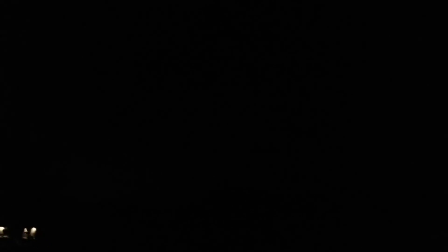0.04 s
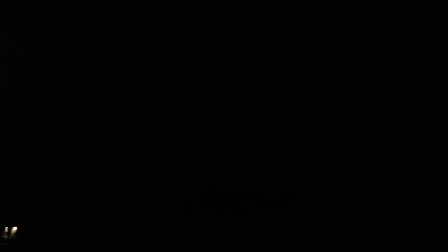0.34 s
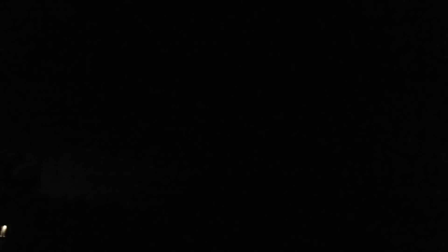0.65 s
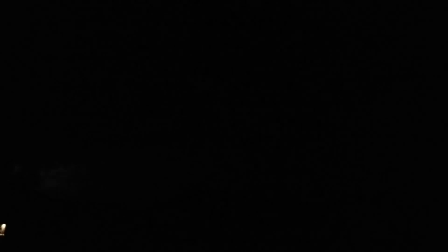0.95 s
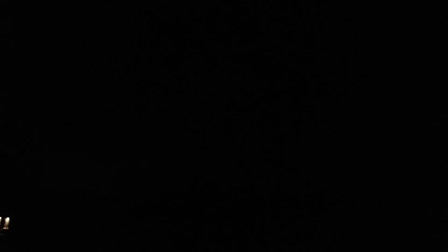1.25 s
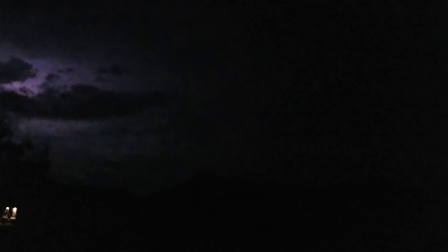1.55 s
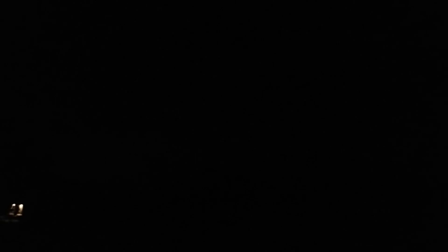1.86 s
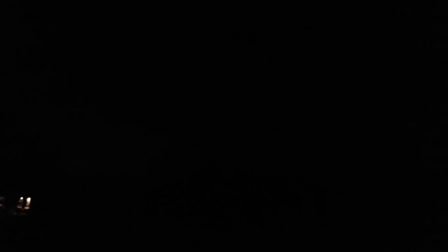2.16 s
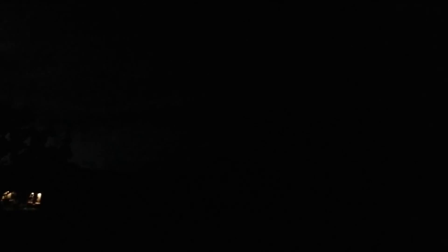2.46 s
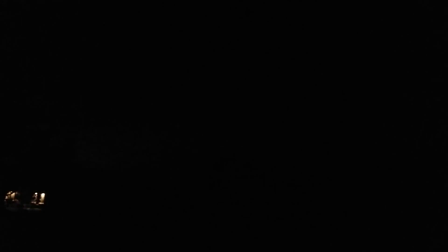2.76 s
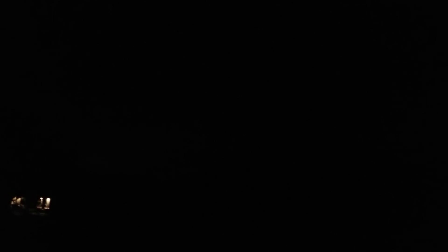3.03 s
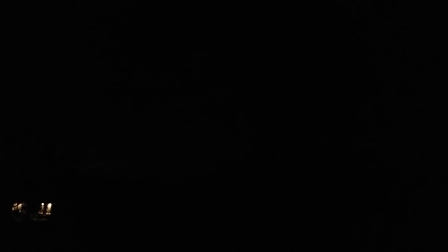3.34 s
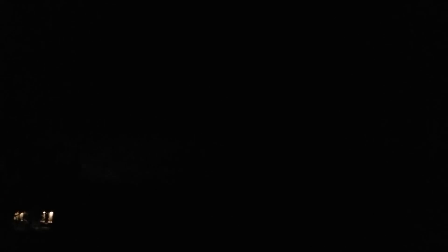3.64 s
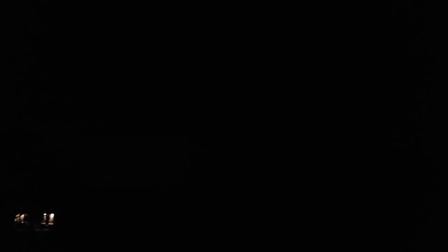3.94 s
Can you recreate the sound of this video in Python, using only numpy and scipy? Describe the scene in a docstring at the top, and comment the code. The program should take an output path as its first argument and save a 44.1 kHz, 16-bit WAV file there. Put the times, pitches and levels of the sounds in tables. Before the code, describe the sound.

Close raindrops splat and patter steadily while thunder rumbles softly far away.

```python
"""Water drips and splats on hard ground close by, in night rain heard from under a shelter.
Each impact radiates a short noise burst; heavy drops knock on a hollow surface, and a few trap a
ringing bubble. Splats reflect from a near surface about 3 ms later and again from the walls around.
Behind them lie finer patter, the hiss of far rain and rolling distant thunder.
Everything reaches the left microphone slightly before the right."""
import sys
import numpy as np
from scipy import signal
from scipy.fft import rfft, irfft
from scipy.io import wavfile
from scipy.ndimage import uniform_filter1d

SR = 44100
rng = np.random.default_rng(int(sys.argv[2]) if len(sys.argv) > 2 else 0)


def output_pcm(signal):
    """Save a mono or channel-first signal as 16-bit PCM at the path in sys.argv[1].

    Samples are clipped to [-1, 1] before scaling.
    """
    pcm = np.clip(np.atleast_2d(signal).T, -1, 1) * 32767
    wavfile.write(sys.argv[1], SR, np.round(pcm).astype(np.int16))


N = 176400


def undb(db):
    """The decibel scale: 20 dB is a tenfold amplitude."""
    return 10 ** (np.asarray(db) / 20)


def colour(x, points):
    """Spectral shaping by (frequency [Hz], gain [dB]) points, rolling off below the first."""
    hz, db = np.array(points, float).T
    f = np.maximum(np.fft.rfftfreq(x.shape[-1], 1 / SR), 1)
    gain = undb(np.interp(np.log(f), np.log(hz), db))
    bass_rolloff = np.minimum(f / hz[0], 1) ** 2
    return irfft(rfft(x) * gain * bass_rolloff, x.shape[-1])


def unit_rms(x):
    """Normalisation to unit mean power."""
    return x / np.sqrt(np.mean(x ** 2))


def delay(x, seconds):
    """Shift theorem: a linear phase lag delays a signal, even by part of a sample."""
    f = np.fft.rfftfreq(x.shape[-1], 1 / SR)
    return irfft(rfft(x) * np.exp(-2j * np.pi * f * seconds), x.shape[-1])


def stereo_pair(left, other, correlation):
    """Partial coherence: the right channel blends the left with an independent signal."""
    return np.array([left, correlation * left + np.sqrt(1 - correlation ** 2) * other])


def add(out, sound, at_s):
    """Superposition: a sound sums into the mix from its onset."""
    onset = int(round(at_s * SR))
    start, stop = max(onset, 0), min(onset + sound.shape[-1], N)
    if stop > start:
        out[:, start:stop] += sound[..., start - onset:stop - onset]


# Swells of thunder (time [s], relative roll level [dB], relative growl level [dB])
THUNDER_SWELLS = [(0.0, -55, -58), (0.15, -54, -57), (0.6, -60, -64), (0.72, -57, -63), (0.96, -48, -54),
                  (1.15, -56, -61), (1.3, -55, -57), (1.42, -60, -61), (1.63, -55, -56), (1.87, -54, -56),
                  (2.07, -45.5, -47), (2.3, -53, -54), (2.55, -53, -58), (2.82, -41.5, -56),
                  (2.98, -46.5, -56.5), (3.12, -44.5, -53.5), (3.45, -53, -56), (3.8, -57, -61)]
# Spectrum of the deep roll (frequency [Hz], relative density [dB])
ROLL_SPECTRUM = [(25, -7), (40, 4), (70, 9.5), (92, 9.5), (125, -4.5), (210, -40.5)]
# Spectrum of the higher growl (frequency [Hz], relative density [dB])
GROWL_SPECTRUM = [(85, -6), (135, 3.5), (270, -4.5), (345, -5), (440, -12.5), (560, -22.5), (750, -37),
                  (1200, -64)]


def thunder(roll_gain_db=.5, growl_gain_db=2.64):
    """An extended source: roll and growl swell as sound from different parts of the flash arrives."""
    times, roll_db, growl_db = np.array(THUNDER_SWELLS).T
    t, out = np.arange(N) / SR, 0
    bands = (ROLL_SPECTRUM, roll_db + roll_gain_db), (GROWL_SPECTRUM, growl_db + growl_gain_db)
    for spectrum, db in bands:
        rumble = colour(stereo_pair(*rng.standard_normal((2, N)), correlation=.82), spectrum)
        running_power = uniform_filter1d(np.mean(rumble ** 2, axis=0), size=SR // 5)
        out = out + rumble / np.sqrt(running_power) * undb(np.interp(t, times, db))
    return out


# Spectrum of distant rain (frequency [Hz], relative density [dB])
HISS_SPECTRUM = [(500, -6), (1500, -6), (2800, -3), (5800, -6), (8500, -11), (11500, -4.5), (15500, 2.5)]


def far_rain(level_db=-60.5):
    """Incoherent summation: countless distant drops merge into a smooth hiss."""
    noise = stereo_pair(*rng.standard_normal((2, N)), correlation=.13)
    return unit_rms(colour(noise, HISS_SPECTRUM)) * undb(level_db)


RISE_S = .0002  # attack of every splash, bubble and knock
NEAR_ECHO_S, NEAR_ECHO_SPREAD_S, NEAR_ECHO_DB = .0032, .000182, -2.5
# Mean spectrum of a splash (frequency [Hz], gain [dB])
SPLASH_SPECTRUM = [(800, -25), (1100, -21.5), (1450, -17), (1900, -12.5), (2200, -4), (2850, 2), (3300, 0),
                   (3800, 4.5), (4200, -2.5), (7400, 1), (8700, -3.5), (10800, 1.5), (12300, 2),
                   (15500, -3.5)]


def splashes(times, levels_db, burst_s, size=1024):
    """Impact noise: each drop gives a burst and a short spatter, mirrored by a near surface."""
    lead_s, spatter_s, spatter_db, mic_jitter_s = .002, .002, -13.5, .00001
    body_top_hz, splat_top_hz, tint_db, averaging_s = 4500, 9000, 3.5, .007
    t = np.maximum(np.arange(size) / SR - lead_s, 0)
    f = np.fft.rfftfreq(size, 1 / SR)
    left, other, tint, chance = np.split(rng.standard_normal((len(times), 4 * size)), 4, axis=1)
    length, lag, echo = np.clip(chance.T[:3, :, None], -2, 2)
    decay_s = burst_s * np.exp(.45 * length)
    spatter = undb(spatter_db) * np.exp(-t / spatter_s)
    envelope = (1 - np.exp(-t / RISE_S)) * (np.exp(-t / decay_s) + spatter)
    bursts = stereo_pair(left * envelope, other * envelope, correlation=.78)
    bursts[1] = delay(bursts[1], mic_jitter_s * lag)
    # A smooth random ripple gives each drop its own colour.
    tint = unit_rms(uniform_filter1d(uniform_filter1d(tint, size=24), size=24))[:, :len(f)]
    spectra = rfft(colour(bursts, SPLASH_SPECTRUM)) * undb(tint_db * tint)
    body = 1 / (1 + (f / body_top_hz) ** 20)
    spray = 1 - 1 / (1 + (f / splat_top_hz) ** 20)
    splat = 1 - body - spray
    drops = 0
    for band, db in zip((body, splat, spray), levels_db.T):
        part = irfft(spectra * band)
        power = np.mean(np.sum(part ** 2, axis=-1), axis=0) / (averaging_s * SR)
        drops = drops + part * (undb(db) / np.sqrt(power))[:, None]
    drops = drops + undb(NEAR_ECHO_DB) * delay(drops, NEAR_ECHO_S + NEAR_ECHO_SPREAD_S * echo)
    out = np.zeros((2, N))
    for k, at in enumerate(times):
        add(out, drops[:, k], at - lead_s)
    return out


# Near drips and their relative band levels (time [s], low body [dB], mid splat [dB], high spray [dB])
NEAR_DRIPS = [(0.0116, -70, -51, -43), (0.0535, -94, -52, -43), (0.1182, -84, -53, -43.5),
              (0.214, -49.5, -56, -49), (0.2882, -51.5, -50, -43), (0.298, -57, -63, -40.5),
              (0.318, -49.5, -46.5, -42), (0.4, -56, -57, -40), (0.4535, -46, -50, -43.5),
              (0.552, -69, -53.5, -37.5), (0.584, -71, -50, -47), (0.632, -70, -54, -44.5),
              (0.7045, -53, -44.5, -36), (0.7384, -53, -48.5, -39.5), (0.7478, -54.5, -55, -48),
              (0.8215, -53.5, -49, -40), (0.865, -51, -52.5, -48), (0.952, -53.5, -59, -49),
              (0.994, -53, -47, -41.5), (1.0463, -70, -61, -45.5), (1.061, -56.5, -46.5, -44.5),
              (1.1198, -59, -55, -40.5), (1.1371, -51.5, -54, -40), (1.1588, -50, -48, -39),
              (1.177, -64, -55, -45), (1.2348, -50, -46.5, -43), (1.25, -46.5, -54.5, -42.5),
              (1.3371, -59, -49.5, -45.5), (1.3917, -78, -51, -46.5), (1.4803, -78, -53.5, -49),
              (1.5357, -64, -51, -47), (1.5834, -48, -51.5, -40.5), (1.601, -55.5, -52, -48),
              (1.659, -59, -56, -74), (1.7729, -49, -43.5, -40), (1.794, -49, -57, -48),
              (1.8718, -78, -49, -63), (1.9218, -62, -52, -38.5), (1.951, -51, -51.5, -44),
              (1.962, -61, -48, -40), (1.9985, -53, -51.5, -45), (2.014, -49, -62, -48),
              (2.066, -74, -51.5, -45.5), (2.112, -77, -51.5, -40.5), (2.166, -74, -65, -42),
              (2.1794, -45.5, -50, -40), (2.191, -47, -57, -58), (2.2536, -62, -48.5, -40),
              (2.2752, -50, -46, -47), (2.337, -50, -52, -39), (2.3907, -59, -60, -44),
              (2.4284, -45, -50.5, -40), (2.465, -49.5, -46.5, -42), (2.5131, -55, -45.5, -42.5),
              (2.5691, -51, -45.5, -41.5), (2.5847, -66, -70, -47), (2.623, -53.5, -55, -46.5),
              (2.6485, -48.5, -55, -48), (2.6711, -54, -64, -38), (2.7038, -54, -57, -42.5),
              (2.7243, -44, -53, -54), (2.7442, -48.5, -55, -45), (2.7783, -54.5, -51.5, -45),
              (2.8216, -57, -55, -42.5), (2.885, -49.5, -73, -60), (2.9418, -45, -51, -40.5),
              (2.997, -57, -54, -46), (3.0678, -36, -40.5, -34.5), (3.0807, -65, -48, -43),
              (3.1076, -59, -60, -47), (3.136, -76, -54, -52), (3.186, -77, -52.5, -37.5),
              (3.2145, -83, -54, -46), (3.2722, -77, -53.5, -40.5), (3.2983, -70, -45, -42.5),
              (3.3158, -53, -58, -45), (3.3448, -43, -51.5, -39.5), (3.3552, -54, -50, -44),
              (3.399, -67, -52, -43), (3.4214, -54.5, -54.5, -50), (3.5083, -53, -52, -38),
              (3.6187, -51, -46, -40.5), (3.679, -59, -48, -61), (3.7061, -67, -49, -40),
              (3.7209, -48.5, -51, -42.5), (3.762, -51, -61, -45.5), (3.805, -52.5, -52, -41),
              (3.8363, -57, -48, -70), (3.9475, -57, -47, -37.5), (3.9834, -51, -53.5, -41.5)]


def drips(band_gains_db=(-4.5, .23, 0)):
    """Impulsive excitation: big drops strike close by, so briefly that the sound is broadband."""
    rows = np.array(NEAR_DRIPS)
    return splashes(rows[:, 0], rows[:, 1:] + band_gains_db, burst_s=.00048)


def patter(drops_per_s=165, band_levels_db=(-70, -63.5, -56)):
    """Shot noise: softer drops land further off at random moments, varying in size and colour."""
    count = int(drops_per_s * N / SR)
    chance = np.clip(rng.standard_normal((count, 4)), -2, 2)
    size_db, colour_db = 2.6 * chance[:, :1], 2 * chance[:, 1:]
    times = rng.random(count) * N / SR
    return splashes(times, np.array(band_levels_db) + size_db + colour_db, burst_s=.0009)


# Reflections from the walls (delay [s], smear [s], level [dB])
WALL_ECHOES = [(0.0138, 0.0012, -14.5), (.033, 0.0028, -16.5), (.058, 0.0033, -21)]


def yard_echoes(x, t60_s=.066, tail_db=-13.5):
    """Convolution with an impulse response: smeared wall reflections and a faint open-air tail."""
    t = np.arange(SR // 2) / SR
    echo_power = sum(undb(db) ** 2 * (t > at) * 2 / smear * np.exp(-2 * np.abs(t - at) / smear)
                     for at, smear, db in WALL_ECHOES)
    first_s, decay_per_s = WALL_ECHOES[0][0], 2 * np.log(1000) / t60_s
    tail = (t > first_s) * decay_per_s * np.exp(-decay_per_s * np.abs(t - first_s))
    envelope = np.sqrt((echo_power + undb(tail_db) ** 2 * tail) / SR)
    response = stereo_pair(*(rng.standard_normal((2, len(t))) * envelope), correlation=.23)
    return signal.fftconvolve(x, response, axes=1)[:, :N]


# Drops that trap a bubble (time [s], starting pitch [Hz], level [dB])
BUBBLES = [(0.3185, 2920, -39.5), (0.335, 3010, -39.5), (0.417, 2600, -40), (.4524, 3520, -41),
           (0.704, 2626, -37.5), (0.952, 2900, -48), (1.177, 2550, -46), (1.249, 2870, -39.5),
           (1.772, 2910, -31), (2.419, 3260, -36.5), (3.0674, 3854, -45), (3.344, 2910, -39),
           (3.9825, 2930, -37)]


def plinks(decay_s=.0019, glide_per_s=5.3):
    """Bubble resonance: trapped air rings briefly, rising in pitch, mirrored by the near surface."""
    out, t = np.zeros((2, N)), np.arange(SR // 40) / SR
    envelope = np.exp(-t / decay_s) * (1 - np.exp(-t / RISE_S))
    for at, hz, db in BUBBLES:
        chirp = np.sin(2 * np.pi * hz * t * (1 + glide_per_s * t / 2))
        add(out, undb(db) * chirp * envelope, at)
    return out + undb(NEAR_ECHO_DB) * delay(out, NEAR_ECHO_S)


# Heavy drops on a hollow surface (time [s], relative level [dB])
HEAVY_DROPS = [(0.319, -59.5), (0.416, -61.5), (1.1635, -55), (1.7721, -54.5), (2.7222, -59.5),
               (2.882, -58), (2.943, -62.5), (3.068, -58), (3.3446, -56), (3.7607, -57)]
# Modes of that surface (frequency [Hz], relative level [dB], T60 [s])
SURFACE_MODES = [(1140, -8, .04), (1342, -4, .04), (1580, 3.5, .04), (1900, 3, .025), (2190, 2, .02),
                 (2520, 6, .015), (2950, 6, .015), (3600, 6, .012)]


def knocks(gain_db=5.5, scatter_s=.023, detune_spread=.025, spread_db=2):
    """Modal vibration: heavy drops break into droplets that ring a surface, differently at each spot."""
    out, t = np.zeros((2, N)), np.arange(SR // 8) / SR
    hz, mode_db, t60 = np.array(SURFACE_MODES).T[:, :, None]
    attack, decay = 1 - np.exp(-t / RISE_S), np.exp(-np.log(1000) * t / t60)
    for at, db in HEAVY_DROPS:
        detune, share, phase = rng.standard_normal((3, len(hz), 1))
        modes = np.sin(2 * np.pi * (hz * (1 + detune_spread * detune) * t + phase)) * decay
        ring = np.sum(undb(mode_db + spread_db * share) * modes, axis=0) * attack
        droplets = rng.standard_normal(len(t)) * np.exp(-t / scatter_s)
        knock = signal.fftconvolve(ring, droplets / np.linalg.norm(droplets))
        add(out, undb(db + gain_db) * knock, at)
    return out


def scene():
    """Superposition: near water and its echoes add to far rain and thunder."""
    far = thunder() + far_rain()
    water = drips() + knocks() + plinks() + patter()
    return far + water + yard_echoes(water)


# Lag of the right microphone behind the left (frequency [Hz], phase [rad])
RIGHT_PHASE_LAG = [(0, 0), (3270, 6.5), (4480, 7.5), (7300, 11.5), (8600, 13.5), (9500, 19.5), (10400, 23),
                   (13600, 27.5), (16000, 37)]
# Response of the right microphone relative to the left (frequency [Hz], gain [dB])
RIGHT_GAIN = [(100, -1.24), (1500, -0.5), (5000, -3.5), (7800, -5), (9500, 1), (15500, -3.5)]


def record(dry, cutoff_hz=15600):
    """Acoustic shadow: the recorder delays and shades the right side; both sides are low-passed."""
    f = np.fft.rfftfreq(N, 1 / SR)
    gain = undb(np.interp(f, *np.array(RIGHT_GAIN).T))
    lag = np.interp(f, *np.array(RIGHT_PHASE_LAG).T)
    right = irfft(rfft(dry[1]) * gain * np.exp(-1j * lag), N)
    lowpass = signal.ellip(8, .1, 60, cutoff_hz, fs=SR, output="sos")
    return signal.sosfiltfilt(lowpass, np.array([dry[0], right]))


dry = scene()
out = record(dry)
output_pcm(out)
```